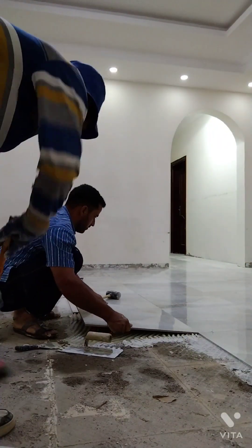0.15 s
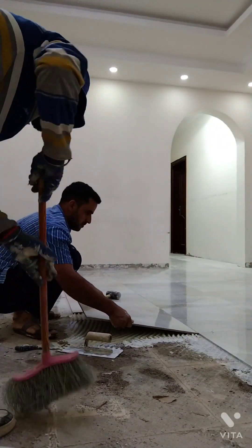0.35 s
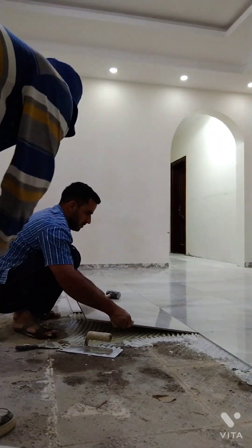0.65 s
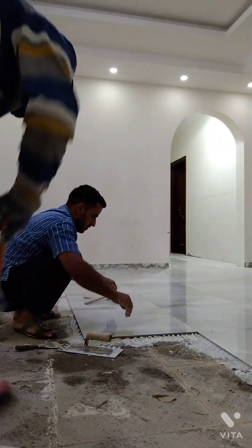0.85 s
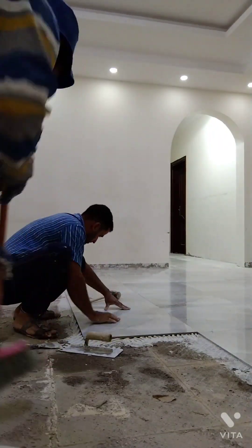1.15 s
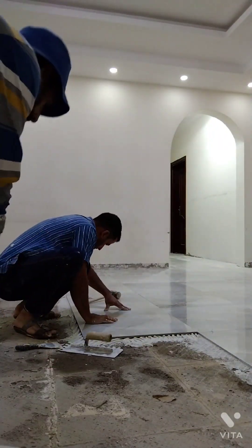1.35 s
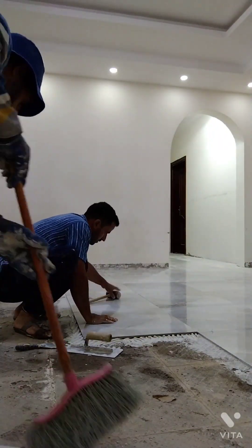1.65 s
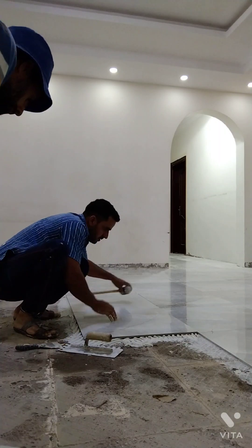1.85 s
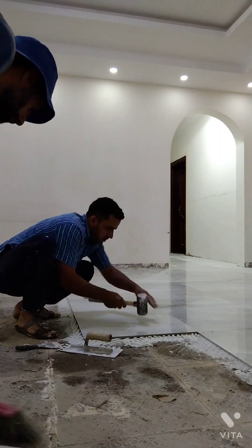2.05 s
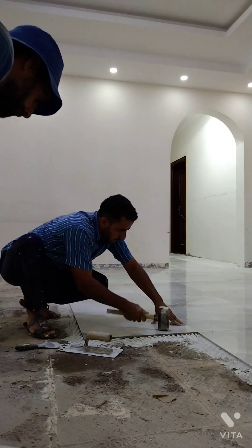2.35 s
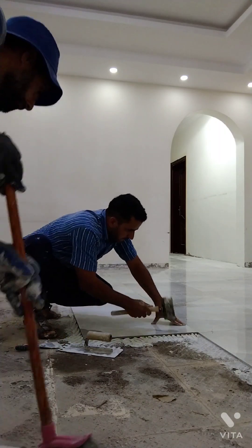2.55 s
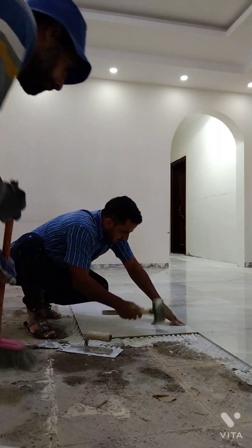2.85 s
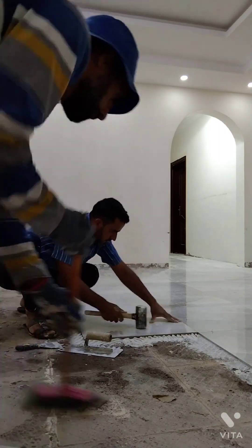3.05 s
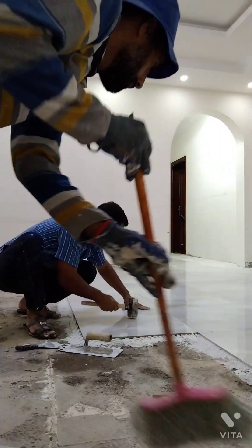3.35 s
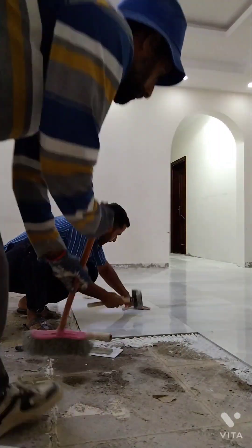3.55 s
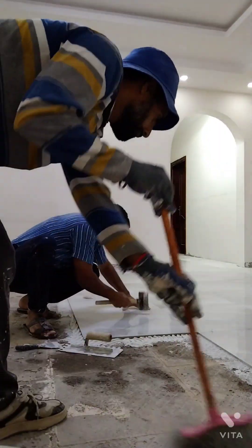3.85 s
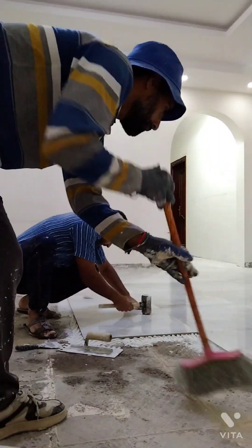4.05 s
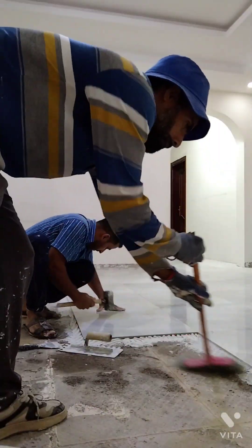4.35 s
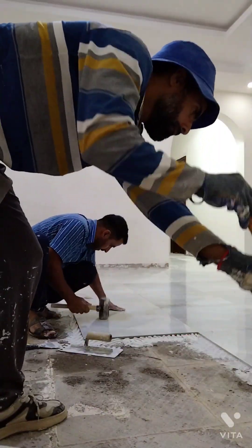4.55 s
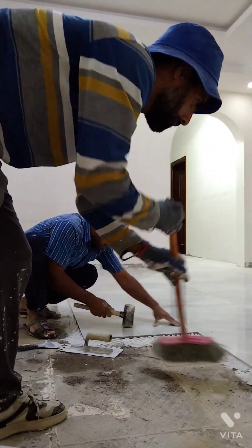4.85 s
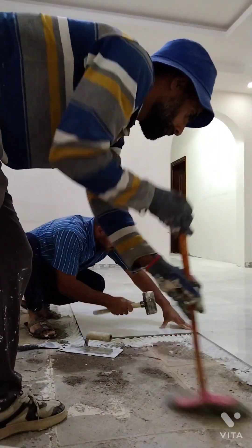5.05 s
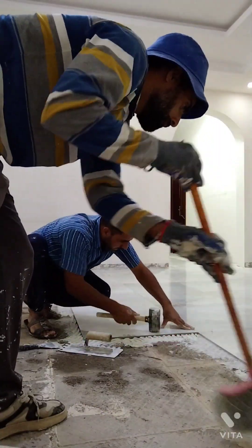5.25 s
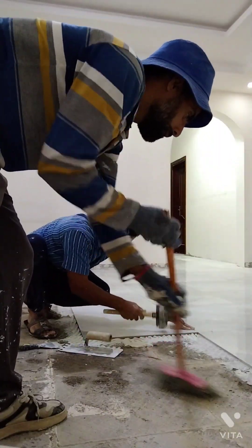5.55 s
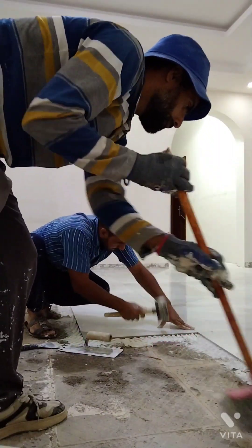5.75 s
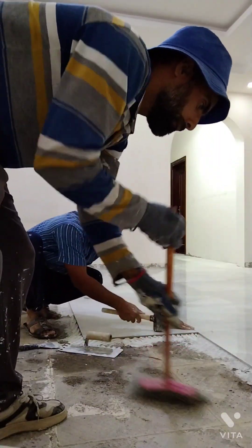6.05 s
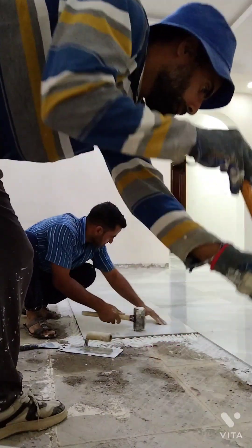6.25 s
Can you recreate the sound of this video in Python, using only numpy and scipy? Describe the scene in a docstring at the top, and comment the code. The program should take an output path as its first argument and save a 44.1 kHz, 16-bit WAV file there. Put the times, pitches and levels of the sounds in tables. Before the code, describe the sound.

In a bare, reverberant hall, faint sweeping and small steel scrapes give way to loud, brisk mallet taps bedding a floor tile.

```python
"""A steel scraper already under way dies off, a heavy thud follows, and a stiff broom hisses over gritty concrete.
Then a rubber mallet beds a large tile in quick runs of taps in a bare, echoing hall under construction.
Taps are damped swings with a crack, the hiss of broom and one trowel scrape is a train of random impulses,
and blades are resonators driven by noise. Walls answer as discrete echoes, the hall as decaying noise, over
still air and a faint rumble. The phone evens the level and mutes bands that fall quiet."""
import sys
import numpy as np
from scipy import signal
from scipy.fft import rfft, irfft
from scipy.io import wavfile
from scipy.ndimage import uniform_filter1d

SR = 44100
rng = np.random.default_rng(int(sys.argv[2]) if len(sys.argv) > 2 else 0)


def boost(x):
    """Linear amplitude factor 10**(x/20) for a level x in decibels (scalar or array-like)."""
    u = np.asarray(x, float) / 20
    return 10 ** u


def transcribe(u):
    """Save the signal u as a 16-bit wav file named by the first command-line argument.

    u: samples, shape (n,) or (channels, n), limited to [-1, 1]; the rate is SR.
    q: integer samples, one column per channel.
    """
    v = np.clip(np.atleast_2d(u).T, -1, 1)
    q = np.round(v * 32767).astype(np.int16)
    wavfile.write(sys.argv[1], SR, q)


N = 282460
LEAD = 11025   # samples of sound already under way before t = 0

# mallet on tile: [t/s, blow level/dB, shading of the direct path by the tiler's body/dB, crack level/dB]
TAPS = [(1.7795, -6.5, -6, 10), (1.9228, -8.5, -10, 12), (2.0496, -7, -55, 11.5), (2.19, -8, -11, 10),
        (2.323, -8.5, -10, 4), (2.932, -7.5, -10, 1.5), (3.0789, -7, -15, 9), (3.2149, -7, -10.5, 10),
        (3.3541, -7.5, -20, 10.5), (3.5036, -8.5, -6.5, 9), (3.861, -8.5, -46, 6.5),
        (3.9908, -12.5, -13.5, 10), (4.5332, -5, -21, 9), (4.6730, -5.5, -8.5, 4.5),
        (4.8192, -5.5, -8.5, 6), (4.9397, -5.5, -11, 8.5), (5.08, -5, -7, 7.5), (5.2110, -9, -3, 11),
        (5.3410, -4.5, -8, 6.5), (6.357, -28.5, -19, -23)]
# each run of taps stays on one place of the tile: [number of taps, index into WALL_ECHOES]
RUNS = [(5, 0), (5, 1), (2, 2), (7, 3), (1, 0)]
# pitch of the tile, one value per run: [f/Hz]
RUN_PITCH = [595, 339, 381, 528, 483]
# swings below this are stopped by the adhesive, one value per run: [f/Hz]
RUN_BEDDING = [156, 270, 226, 126, 232]
# width of the swing's resonance, one value per run: [share of the pitch]
RUN_WIDTH = [1.06, 1.4, 0.66, 1.37, 0.96]
# brightness of the crack, one value per run: [slope about 6 kHz/(dB per octave)]
RUN_TILT = [2, 3, 1.5, 1.5, -15]
# the low swing is stronger close by, along the floor, one value per run: [level/dB]
RUN_NEAR = [1.4, 5.1, 1.8, 1.3, 4.3]
# crack where rubber meets glaze, with the small microphone's peak, before the tilt: [f/Hz, level/dB per Hz]
CRACK_SPECTRUM = [(1000, -29), (2000, 6.5), (3200, 4), (4500, -1.5), (7000, -3), (9000, -8.5), (12000, -12),
                  (14700, -10), (16500, -13)]
# direct sound returning off tools and knees: [delay/s, level/dB]
FLOOR_ECHOES = [(.0024, -2), (.0052, -6.5)]
# nearest walls from each place, before random unevenness: [delay/s, level/dB at each of ECHO_BANDS]
WALL_ECHOES = [
    [(.0102, 5.5, -24, -9, -13), (.0137, -1, 4.5, 4, -10), (.0226, -2, -3, 1, -8), (.0265, -4, -15, 5, -13),
     (.034, 9.5, -6, -3, -14), (.043, -23, -5, 1, -18)],
    [(.0097, -4, 4.5, -13, 6.5), (.0154, 4, 12.5, -19, -10), (.0182, -5, -16, -21, -13),
     (.0292, 1, -15, -0.5, -11), (.043, -1, -26, -3, -26)],
    [(.0095, 5, -10, -17, -4), (.0137, -2, 1, -6, -13), (.022, -6, 11, -16, -12), (.0275, -6, -1, -8, -8),
     (.043, -1, -1, -8, -5)],
    [(.0099, -0.5, 6.5, 5, 0), (.0155, 3, 10.5, -16, -3), (.025, -14, -10, -14, -17),
     (.0292, -17, 2, 0, -17), (.033, 1.5, -8, -10, -5), (.0425, -7, -21, 2, -12), (.052, -18, -5, -7, -7)],
]
# frequencies at which the wall echoes are given: [f/Hz]
ECHO_BANDS = [700, 3000, 6500, 13000]
# broom strokes, and at 1.055 the hiss of the trowel's scrape: [start t/s, length/s, peak level of the hiss/dB]
HISSES = [(-.1, 0.074, -51), (0.196, 0.038, -44.5), (0.23, 0.29, -63.5), (0.513, 0.13, -91),
          (0.804, 0.27, -59.5), (1.055, 0.056, -55), (1.2, 0.11, -72), (1.346, 0.23, -60),
          (2.473, 0.17, -60), (2.771, 0.13, -100), (3.74, 0.38, -70), (4.365, 0.38, -61), (5.51, 0.11, -63),
          (5.657, 0.16, -58), (6, 0.17, -56.5), (6.237, 0.091, -66.5)]
# hiss over grit, relative spectrum: [f/Hz, level/dB per Hz]
HISS_SPECTRUM = [(700, -17), (1200, -4), (2000, -10), (4000, -6), (6200, -5.5), (8000, -6), (11000, -8),
                 (14700, -1), (16000, 4)]
# grit flicked by the bristles: [t/s, level/dB]
GRIT_TICKS = [(.537, -66), (.567, -21), (1.255, -62), (2.697, -28.5)]
# trowel modes, before damping and tilt: [f/Hz, width/Hz, level/dB]
TROWEL_MODES = [(1230, 74, -3), (1850, 36, 0), (3000, 48, -9), (3210, 46, -12), (3850, 44, -13),
                (4200, 54, -12), (4740, 29, -16), (4920, 130, -14), (5440, 57, -19), (5920, 51, -13),
                (6280, 56, -10), (6490, 63, -10), (6780, 35, -23), (6990, 18, -27), (7520, 40, -27),
                (7790, 52, -27), (8120, 25, -35), (8610, 60, -33), (9070, 30, -26), (9250, 47, -22),
                (9540, 21, -33), (9950, 98, -19), (10700, 71, -31), (11100, 58, -35), (11600, 33, -39),
                (12500, 24, -33), (12800, 41, -30), (14000, 95, -28), (14800, 90, -26), (15300, 42, -35)]
# scraper modes, before damping and tilt: [f/Hz, width/Hz, level/dB]
SCRAPER_MODES = [(1220, 38, -3), (1690, 95, -8), (2190, 46, -11), (2650, 50, -7), (3010, 31, -4),
                 (3500, 92, -15), (4410, 46, -18), (5010, 99, -27), (5530, 70, -30), (5780, 87, -21),
                 (6220, 73, -28), (6640, 74, -27), (6890, 87, -28), (7240, 24, -35), (8010, 75, -37),
                 (8890, 59, -42), (9500, 76, -43), (10000, 100, -41), (10700, 49, -45), (11300, 55, -46),
                 (13100, 31, -46), (13900, 45, -43), (14200, 32, -41), (14600, 69, -43), (15200, 66, -36),
                 (15500, 50, -44)]
# trowel touched or dragged: [t/s, level/dB, length/s, centre f/Hz, spread/octaves]
TROWEL_TOUCHES = [(0.585, -54, 0.064, 6490, 0.012), (0.586, -54, 0.14, 9950, 0.033),
                  (0.568, -106.5, 0.063, 13500, 0.028), (1.044, -36.5, 0.044, 3550, 4),
                  (1.055, -51, 0.06, 14000, 0.2), (1.1, -50.5, 0.13, 1820, 1.02),
                  (1.38, -53, 0.038, 8870, 0.011), (1.4, -73, 0.044, 11000, 0.0067),
                  (5.954, -51, 0.06, 4200, 0.018)]
# scraper touched or dragged: [t/s, level/dB, length/s, centre f/Hz, spread/octaves]
SCRAPER_TOUCHES = [(-.12, -42.5, 0.038, 2350, 0.9), (-.12, -64.5, 0.099, 1170, 0.57),
                   (-.06, -53, 0.2, 4410, .03), (-.04, -49, 0.2, 2190, .03), (-.06, -60, .2, 5780, .02),
                   (-.03, -61, .14, 6890, .015), (-.06, -54.5, 0.13, 6400, 0.19),
                   (2.701, -76.5, 0.093, 15180, 0.026), (2.73, -45.5, 0.17, 3000, 1.3),
                   (2.82, -40, .11, 1220, .05), (2.77, -45, .045, 3010, .03), (2.78, -48, .06, 2190, .03),
                   (2.84, -48, .06, 2650, .03), (2.76, -55, .05, 5790, .02), (2.785, -55, .035, 6640, .02)]
# things set down on the slab: [t/s, level/dB, f/Hz, grit level/dB, share sent into the hall/dB]
THUDS = [(0.205, -2, 107, -8, -15.5), (.214, -17.5, 340, -25, -9), (0.237, -16, 610, -13, -11.5),
         (0.646, -30.5, 820, -3.5, 1.5), (3.514, -13, 80.5, -2, -3.5), (4.421, -30, 457, -36, 0),
         (5.22, -1, 130, -17, -49)]
# reverberation time: [f/Hz, T60/s]
HALL_T60 = [(60, 2.32), (200, 1.16), (500, 1.497), (1200, 1.376), (3000, 1.124), (6000, 0.67), (9000, 0.64),
            (12000, 0.42), (15000, 0.22)]
# relative initial level of the reverberation: [f/Hz, level/dB]
HALL_COLOUR = [(50, -14.5), (90, -2.5), (160, -1), (300, 4), (800, 1.5), (1500, 3), (2200, 3), (6500, -5.5),
               (9000, -15), (15000, -10)]
# muting threshold, before it shifts with the whole level: [f/Hz, level/dB per bin]
MUTE_THRESHOLD = [(60, -58), (120, -51), (220, -56.5), (500, -54.5), (1000, -62), (1500, -64.5),
                  (2200, -94), (5000, -99), (15000, -105)]

RUBBER_CUT_HZ, SMEAR_RAD = 1464, .24
DIRECT_DB, BODY_SHADE = 8.5, 0.57   # unshaded direct path; share of the shading that the low swing suffers
HISS_PEAK, HISS_POINTED = 0.31, 0.72   # share of the length spent rising; power of the arch
RESTING_DB = -76   # bristles at rest
TROWEL_DAMPING, SCRAPER_DAMPING = .6, .5   # factors on the mode widths
BLADE_CUT_HZ = 480   # small blades radiate no bass
LIGHT_TOUCH_HALL_DB = -11   # a touch that wakes one mode is close by and hardly reaches the hall
HALLS = 5   # each tap lands a little elsewhere and wakes another pattern of the hall
HALL_DB, HALL_FILL_S = -20.5, 0.0053
FAR_END_S, FAR_END_SPREAD_S, FAR_END_SHARE = 0.1, 0.031, 0.24   # the far end answers late with a swell
AIR_DB, RUMBLE_DB, RUMBLE_HZ = -55, -54.5, 85


def rms_one(x):
    """Normalisation: scale to unit rms."""
    return x / np.sqrt(np.mean(x ** 2) + 1e-20)


def at_hz(points, hz):
    """Interpolation: read a table on a log-frequency axis."""
    table = np.array(points)
    return np.interp(np.log(np.maximum(hz, 1)), np.log(table[:, 0]), table[:, 1])


def coloured(x, points):
    """Linear filtering: multiply the spectrum by a curve in dB."""
    return irfft(rfft(x) * boost(at_hz(points, np.fft.rfftfreq(len(x), 1 / SR))), len(x))


def resonate(x, hz, width_hz):
    """Simple resonance: a pole pair with gain 1 at its peak."""
    r = np.exp(-np.pi * width_hz / SR)
    poles = [1, -2 * r * np.cos(2 * np.pi * hz / SR), r * r]
    return signal.lfilter([(1 - r * r) / 2, 0, (r * r - 1) / 2], poles, x + 1e-18)


def add(out, s, x):
    """Superposition: mix a short sound in at a time."""
    i = round(s * SR)
    out[i:i + len(x)] += x[:max(len(out) - i, 0)]


def tile_blow(click, hz, bedding_hz, wide, tilt_db, crack_db, wander):
    """Impact excitation: spectra of the bedded tile's damped swing and of the crack, and their common phase."""
    # the soft head cannot drive the tile above its cut; wet adhesive stops the slow swings
    rubber = signal.cheby1(4, .5, RUBBER_CUT_HZ, fs=SR, output="sos")
    bedding = signal.butter(3, bedding_hz, "high", fs=SR, output="sos")
    swing = signal.sosfilt(np.vstack([rubber, bedding]), resonate(click, hz, wide * hz))
    tilted = [(f, db + tilt_db * np.log2(max(f, 3000) / 6000)) for f, db in CRACK_SPECTRUM]
    body = rfft(-swing / swing.max())
    edge = rfft(boost(crack_db) * coloured(click, tilted))
    # the contact spreads the treble over a millisecond
    smear = np.cumsum(wander) * np.clip(np.arange(len(body)) / 150 - .6, 0, 1)
    return abs(body), abs(edge), np.exp(1j * (np.angle(body) + SMEAR_RAD * smear))


def mallet(slab_db=-14, echo_uneven_db=3.0, clutter_db=-16):
    """Impact and reflection: each tap is a swing and a crack; walls answer by place, the slab hums into the hall."""
    direct, walls, sent = np.zeros(N), np.zeros(N), np.zeros((HALLS, N))
    t = np.arange(2048) / SR
    click_at = 44   # samples of room for the smear ahead of the blow
    click = 1. * (np.arange(len(t)) == click_at)
    slab = np.sin(2 * np.pi * 95 * t) * np.exp(-t / 0.0027)
    counts, spots = np.transpose(RUNS)
    by_run = [RUN_PITCH, RUN_BEDDING, RUN_WIDTH, RUN_TILT, RUN_NEAR, spots]
    places = np.repeat(by_run, counts, axis=1).T
    draws = rng.standard_normal((len(TAPS), 3, len(t) // 2 + 1))
    for k, (blow, place, (wander, uneven, litter)) in enumerate(zip(TAPS, places, draws)):
        s, blow_db, shade_db, crack_db = blow
        hz, bedding_hz, wide, tilt_db, near_db, spot = place
        body, edge, phase = tile_blow(click, hz, bedding_hz, wide, tilt_db, crack_db, wander)
        start = s - click_at / SR
        shaded = np.hypot(boost(near_db + BODY_SHADE * shade_db) * body, boost(shade_db) * edge)
        add(direct, start, boost(blow_db + DIRECT_DB) * irfft(shaded * phase))
        tap = boost(blow_db) * irfft(np.hypot(body, edge) * phase)
        dull_tap = signal.lfilter([.6], [1, -.4], tap)
        for (delay, *colour_db), c in zip(WALL_ECHOES[int(spot)], uneven):
            echo = coloured(tap, list(zip(ECHO_BANDS, colour_db)))
            add(walls, start + delay, boost(echo_uneven_db * c) * echo)
        # ledges, tools and people scatter fifty weak returns
        for delay, c in zip(.035 + .014 * litter[:50], litter[50:]):
            add(walls, start + max(delay, .011), boost(clutter_db) * c * dull_tap)
        add(sent[k % HALLS], start, tap)
        add(sent[k % HALLS], s, boost(blow_db + slab_db) * slab)
    dull_direct, close = signal.lfilter([.3], [1, -.7], direct), direct.copy()
    for delay, db in FLOOR_ECHOES:
        add(close, delay, boost(db) * dull_direct)
    return close + walls, sent


def pressure():
    """Contact force as envelope: broom strokes and the trowel's scrape each press down and lift in one arch."""
    t, out = np.arange(N) / SR, boost(RESTING_DB)
    for s, length, db in HISSES:
        along = np.interp(t, [s, s + HISS_PEAK * length, s + length], [0, .5, 1])
        out = out + boost(db) * abs(np.sin(np.pi * along)) ** HISS_POINTED
    return out


def broom_and_scrape_hiss(snaps_per_s=9000, size_db=3.0):
    """Shot noise: broom, and once the trowel, snap over grit at random instants; a few grains are flicked loose."""
    sizes = boost(size_db * np.minimum(rng.exponential(1, N), 5)) * rng.choice([-1, 1], N)
    hiss = coloured(sizes * (rng.random(N) < snaps_per_s / SR), HISS_SPECTRUM)
    # the levels in HISSES are the rms in this treble band
    treble = signal.butter(4, [10900, 13600], "band", fs=SR, output="sos")
    out = hiss / np.std(signal.sosfilt(treble, hiss)) * pressure()
    for s, db in GRIT_TICKS:
        add(out, s, boost(db) * np.array([1, -1.5, .5]))
    return out


def steel(modes, touches, damping, rasp_db, tilt_db):
    """Modal excitation: scraping noise wakes the blade's modes near one pitch, over a rasp; also the hall's share."""
    out, sent, t = np.zeros(LEAD + N), np.zeros(LEAD + N), np.arange(20000) / SR
    noises = rng.standard_normal((len(touches), len(t)))
    for (s, db, length, centre_hz, octaves), noise in zip(touches, noises):
        scrape = noise * np.sqrt(np.sin(np.pi * np.clip(t / length, .02, 1)) + 1e-12)
        rasp = resonate(scrape, 0.23 * centre_hz, centre_hz * min(octaves, .9))
        ringing = boost(rasp_db) * rasp * min(octaves, 1) ** 2
        for k, (hz, width, mode_db) in enumerate(modes):
            near = np.exp(-.5 * (np.log2(hz / centre_hz) / octaves) ** 2)
            gain = (-1) ** k * near * boost(mode_db + tilt_db * np.log2(hz / 2000))   # tilt in dB per octave
            ringing += gain * resonate(scrape, hz, damping * width)
        ringing = boost(db) * ringing / np.std(ringing[:int(length * SR)])
        add(out, s + LEAD / SR, ringing)
        add(sent, s + LEAD / SR, ringing * boost(LIGHT_TOUCH_HALL_DB * (octaves < .1)))
    return np.array([out, sent])


def blades():
    """Radiation from small plates: trowel and scraper together, without bass."""
    trowel = steel(TROWEL_MODES, TROWEL_TOUCHES, TROWEL_DAMPING, rasp_db=-10.5, tilt_db=7.5)
    scraper = steel(SCRAPER_MODES, SCRAPER_TOUCHES, SCRAPER_DAMPING, rasp_db=-11, tilt_db=-9.0)
    return signal.sosfilt(signal.butter(2, BLADE_CUT_HZ, "high", fs=SR, output="sos"), trowel + scraper)


def thuds(cycles=0.41):
    """Heavily damped oscillation: a low push into the slab and a puff of grit; also what reaches the hall."""
    out, sent, t = np.zeros(N), np.zeros(N), np.arange(9000) / SR
    puffs = rng.standard_normal((len(THUDS), len(t)))
    for (s, db, hz, grit_db, hall_db), puff in zip(THUDS, puffs):
        low = np.sin(2 * np.pi * hz * t) * np.exp(-t * hz / cycles)   # falls to 1/e in this many cycles
        grit = signal.lfilter([.3], [1, -.7], puff) * (1 - np.exp(-t / 0.00018)) * np.exp(-t / 0.0039)
        thud = low + boost(grit_db) * grit
        add(out, s, boost(db) * thud)
        add(sent, s, boost(db + hall_db) * thud)
    return out, sent


def hall(lumpy_db=2.0, lumpy_s=0.24):
    """Diffuse reverberation: bands of noise fill in and die away, treble soonest; lumpy with returns at first."""
    t = np.arange(int(1.8 * SR)) / SR
    edges = 45 * 2 ** np.arange(0, 8.6, 1 / 3)
    white = rng.standard_normal((2, HALLS, len(t)))
    lumps = rng.standard_normal((HALLS, len(t)))
    lumps = rms_one(uniform_filter1d(uniform_filter1d(lumps, size=60), size=60))
    depth = lumpy_db * np.log(10) / 20 * np.exp(-t / lumpy_s)
    white = white * np.exp(depth * lumps - depth ** 2)
    tail = 0
    for k, (low, high) in enumerate(zip(edges, edges[1:])):
        hz = np.sqrt(low * high)
        third_octave = signal.butter(3, [low, high], "band", fs=SR, output="sos")
        band = signal.sosfilt(third_octave, white[k % 2])   # neighbouring bands use different noise
        tail = tail + band * boost(at_hz(HALL_COLOUR, hz) - 60 * t / at_hz(HALL_T60, hz))
    fill = 1 - np.exp(-(t / HALL_FILL_S) ** 2)
    swell = 1 + FAR_END_SHARE * np.exp(-((t - FAR_END_S) / FAR_END_SPREAD_S) ** 2)
    return boost(HALL_DB) * tail * fill * swell


def still_air():
    """Stationary noise: white noise through a one-pole low-pass."""
    return boost(AIR_DB) * rms_one(signal.lfilter([1], [1, -.9], rng.standard_normal(N)))


def faint_rumble():
    """Narrow-band noise: white noise through two equal resonances."""
    once = resonate(rng.standard_normal(N), RUMBLE_HZ, 88)
    return boost(RUMBLE_DB) * rms_one(resonate(once, RUMBLE_HZ, 88))


def scene():
    """Superposition of direct sound, reverberation by convolution, still air and a faint rumble."""
    early, taps_sent = mallet()
    hiss = broom_and_scrape_hiss()
    low, low_sent = thuds()
    tools, tools_sent = blades()
    sent = np.pad(taps_sent, ((0, 0), (LEAD, 0)))
    sent[0] += boost(6.5) * tools_sent + np.pad(boost(2.5) * hiss + low_sent, (LEAD, 0))
    wet = signal.fftconvolve(sent, hall(), axes=1)[:, LEAD:LEAD + N].sum(axis=0)
    return (early + hiss + low + tools[LEAD:] + wet + still_air() + faint_rumble())[None]


def suppressor(x, depth_db=-30, soft_db=3, opening=0.73, quiet_db=-45):
    """Spectral gating: bands under the threshold are turned far down, less readily while the whole is loud."""
    hz, _, z = signal.stft(x, SR, nperseg=1024)
    power = uniform_filter1d(uniform_filter1d(abs(z) ** 2, size=5, axis=0), size=3, axis=1)
    whole_db = 10 * np.log10(signal.lfilter([.25], [1, -.75], power.sum(axis=0)) + 1e-20)
    above = 10 * np.log10(power + 1e-20) - at_hz(MUTE_THRESHOLD, hz)[:, None]
    above = above + opening * np.clip(whole_db - quiet_db, -15, 15)
    closed = 1 / (1 + np.exp(np.clip(above / soft_db, -30, 30)))
    return signal.istft(z * boost(depth_db * closed), SR, nperseg=1024)[1][:N]


def gain_control(x, knee_db=-22, squeeze=0.051, release_db_s=60, attack_s=0.0053):
    """Dynamic compression: level above the knee is turned down quickly and let back slowly."""
    level = 10 * np.log10(uniform_filter1d(x ** 2, size=220) + 1e-12)
    ramp = release_db_s * np.arange(len(x)) / SR
    held = np.maximum.accumulate(level + ramp) - ramp
    r = np.exp(-1 / (attack_s * SR))
    return x * boost(signal.lfilter([1 - r], [1, -r], -squeeze * np.maximum(held - knee_db, 0)))


def low_pass(x):
    """Removes everything above the highest recorded frequency."""
    return signal.sosfilt(signal.butter(12, 15850, fs=SR, output="sos"), x)


def record(dry):
    """Signal chain of the phone: bass cut, suppressor, gain control and soft ceiling."""
    x = signal.sosfilt(signal.butter(5, 62, "high", fs=SR, output="sos"), dry[0])
    x = gain_control(suppressor(x))
    mix = 0.98 * np.tanh(x / 2.353)[None]
    return low_pass(mix)


dry = scene()
out = record(dry)
transcribe(out)
```